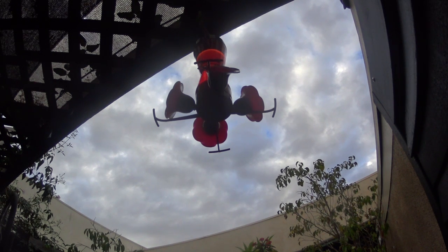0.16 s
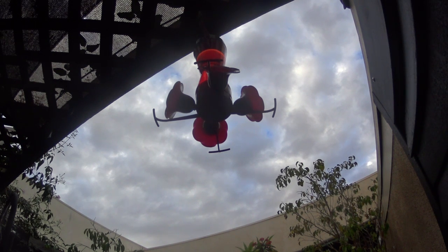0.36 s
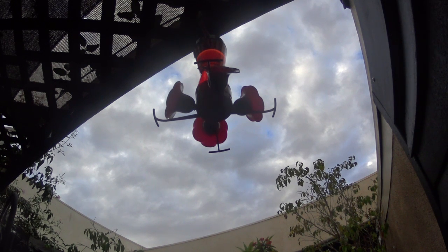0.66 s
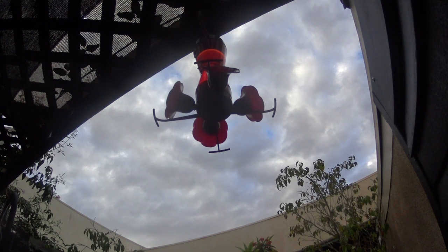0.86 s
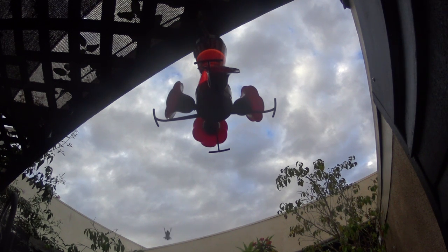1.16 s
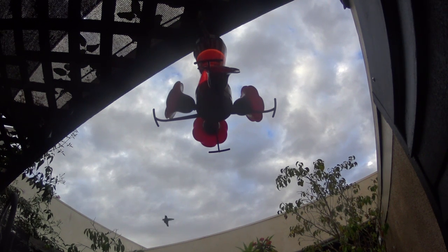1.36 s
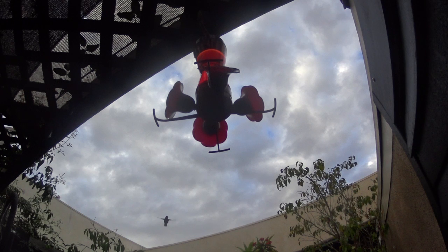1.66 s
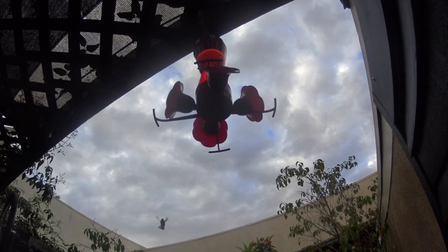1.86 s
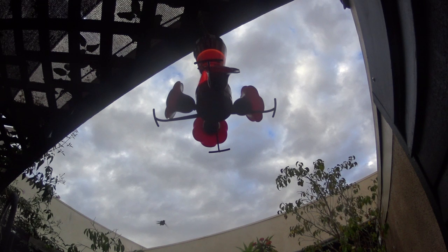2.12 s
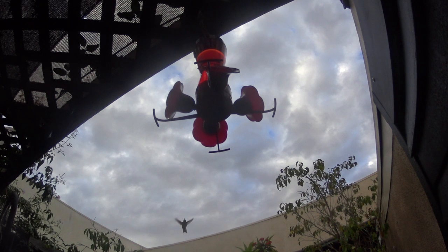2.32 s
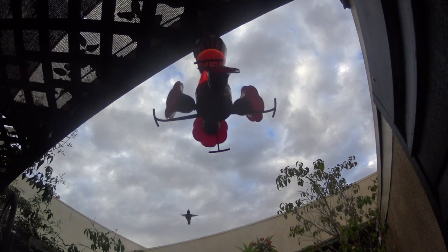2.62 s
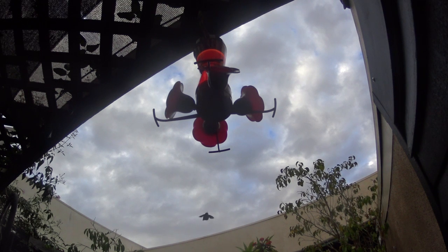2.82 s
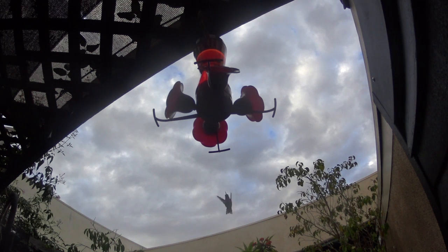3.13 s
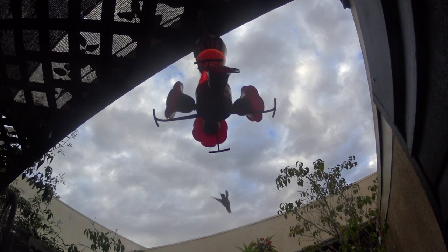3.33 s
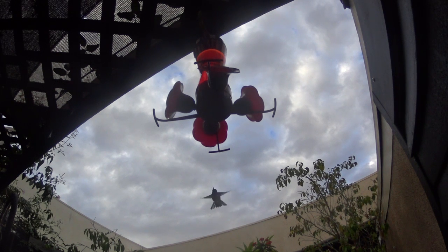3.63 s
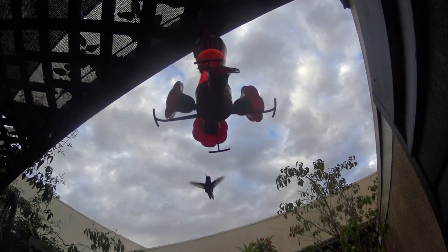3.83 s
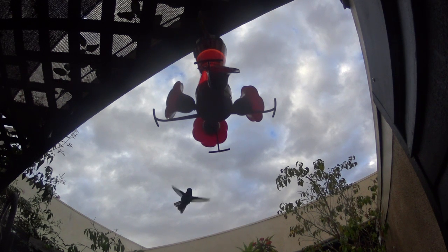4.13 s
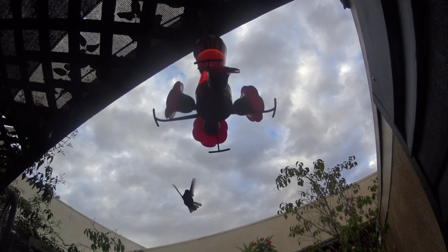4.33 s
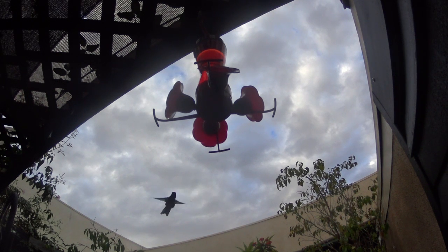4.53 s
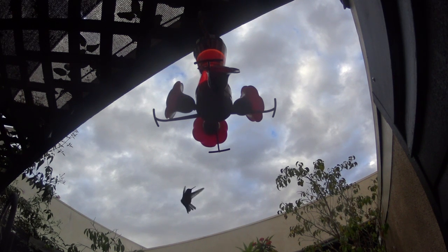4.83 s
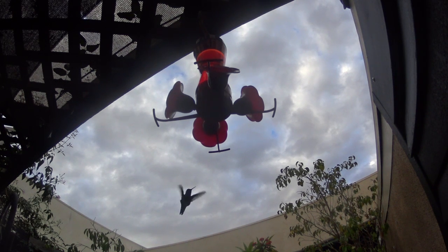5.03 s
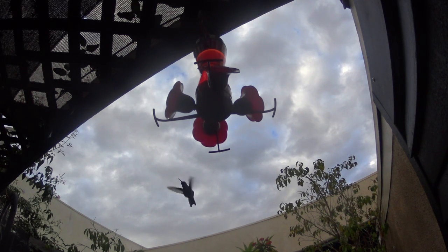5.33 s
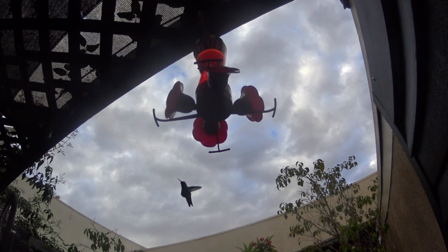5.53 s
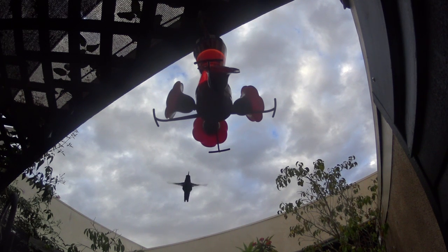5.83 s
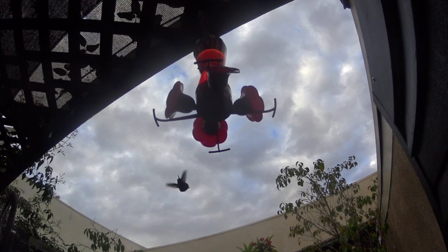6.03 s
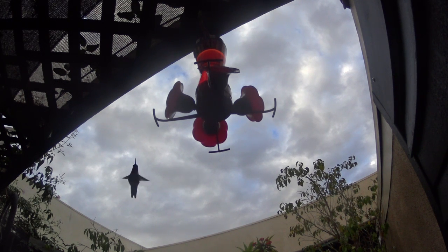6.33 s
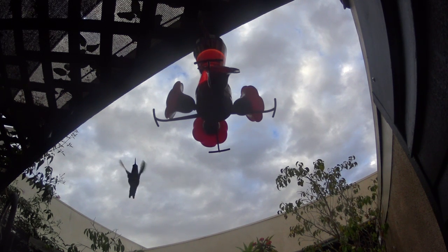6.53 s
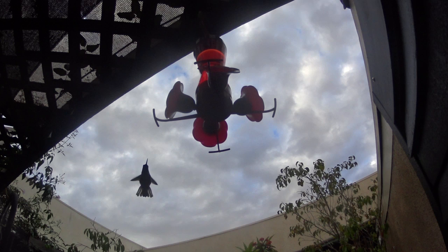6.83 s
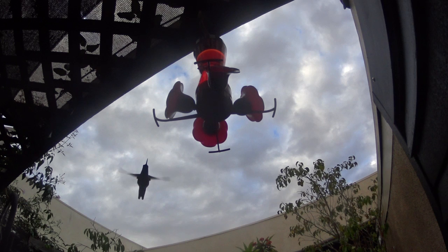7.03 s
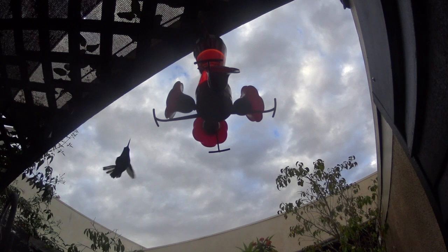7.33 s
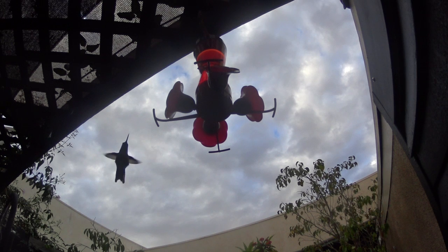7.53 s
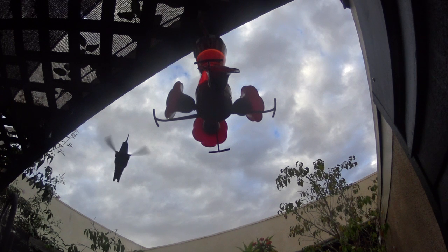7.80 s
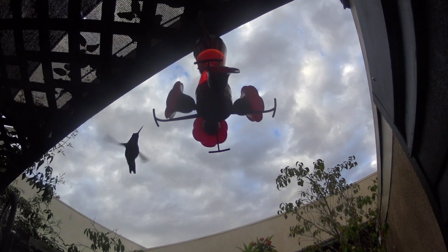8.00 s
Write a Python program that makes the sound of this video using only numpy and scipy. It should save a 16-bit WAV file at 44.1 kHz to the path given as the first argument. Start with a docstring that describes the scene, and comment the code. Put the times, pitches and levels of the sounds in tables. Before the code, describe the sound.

A hovering hummingbird's wings hum and swish while it gives sharp high chips that grow louder, over a fan drone and distant traffic.

```python
"""A walled backyard: the far wash of the town and the drone of a fan unit run throughout.
A hummingbird flies up in the first second and hovers, its wingbeats humming, each half stroke a swish.
From 1.2 s it darts now and then, and the wings swell and quicken.
From 1.5 s it gives sharp chips, louder toward the end: each is one whistle that plunges
from about 8.5 to 3 kHz in some 10 ms and rings on between the walls."""
import sys
import numpy as np
from scipy import signal
from scipy.fft import rfft, irfft
from scipy.io import wavfile
from scipy.ndimage import uniform_filter1d

SR = 44100
rng = np.random.default_rng(int(sys.argv[2]) if len(sys.argv) > 2 else 0)


def dump_mix(stems):
    """Bounce the given channels to the path in sys.argv[1] as a 16-bit WAV at rate SR."""
    frames = np.atleast_2d(stems).T  # one column per channel
    limited = np.clip(frames, -1, 1)  # hard clip at full scale
    pcm = np.round(limited * 32767).astype(np.int16)
    wavfile.write(sys.argv[1], SR, pcm)


N = 359856


def gain_of(db):
    """Decibels to amplitude."""
    return 10 ** (np.asarray(db) / 20)


def unit_rms(x):
    """Scales to an rms of 1."""
    return x / np.sqrt(np.mean(abs(x) ** 2) + 1e-20)


def curve_at(points, hz):
    """Reads a curve on a log-frequency axis."""
    f, value = np.transpose(points)
    return np.interp(np.log(hz + 1), np.log(f + 1), value)


def automation(rows):
    """Each column of a timed curve, at every sample."""
    s, *columns = np.transpose(rows)
    return [np.interp(np.arange(N) / SR, s, c) for c in columns]


def panned(x, balance_db):
    """Pans a sound, the left balance_db above the right."""
    return np.array([x * gain_of(balance_db / 2), x * gain_of(-balance_db / 2)])


def wander(top_hz):
    """Slow random modulation of rms 1, no faster than top_hz."""
    frames = np.linspace(0, N / SR, 800)
    speed, start = rng.random((2, 24, 1))
    slow = np.sin(2 * np.pi * (top_hz * speed * frames + start)).sum(0)
    return np.interp(np.arange(N) / SR, frames, unit_rms(slow))


def town(level_db=-41.5, swell_db=0.58):
    """A bed of distant traffic and moving air: narrow in the bass, wider above."""
    # tone colour of the wash: f/Hz, relative level/dB
    colour = [(15, -37), (30, -15), (70, -15), (105, -9.5), (160, -2.5), (210, -8), (400, -11.5), (480, -9),
              (620, -16.5), (790, -13.5), (1300, -21.5), (2400, -26), (3300, -31.5), (11000, -42.5)]
    # likeness of left and right: f/Hz, correlation
    likeness = [(60, .99), (200, .98), (350, .93), (600, .72), (1100, .45), (2200, .45), (5000, .35),
                (11000, .5)]
    # pan across the spectrum: f/Hz, left over right/dB
    balance = [(60, -4.5), (190, -4.5), (350, -3), (620, 0), (850, 3.5), (1050, 7.5), (1250, -2), (2000, 0),
               (11000, 0)]
    # phase between the sides: f/Hz, lead of the left/rad
    left_lead = [(60, 0), (300, -.15), (690, -.6), (1030, -2.5), (1290, -1.9), (2200, -1.4), (3200, -1.5),
                 (5400, -.7), (7500, -.1)]
    hz = np.fft.rfftfreq(N, 1 / SR)
    common, separate = rfft(rng.standard_normal((2, N)))
    alike, balance_db = curve_at(likeness, hz), curve_at(balance, hz)
    left = common * gain_of(balance_db / 2) * np.exp(1j * curve_at(left_lead, hz))
    right = (alike * common + np.sqrt(1 - alike ** 2) * separate) * gain_of(-balance_db / 2)
    wash = irfft(np.array([left, right]) * gain_of(curve_at(colour, hz)), N)
    return gain_of(level_db + swell_db * wander(2.19)) * unit_rms(wash)


def fan_unit():
    """Motor and blade tones, wavering in level and phase on their way across the yard."""
    # partials of the drone: f/Hz, level/dB, left over right/dB, unsteadiness/0-1
    partials = [(26.2, -64, -1, .4), (29.6, -61.5, -1, .3), (72.7, -66, -2, .4), (119.8, -50.5, -2.5, .25),
                (124.5, -58, -2.5, .5), (150.5, -46.3, -2.5, .2), (185.1, -57, -2.5, .5),
                (240.2, -61, -2, .4), (267.8, -61.5, -2.5, .5), (293.4, -61, -2, .5), (312.9, -58, -1, .35),
                (374.1, -65, -1, .6), (434, -65, -2.5, .7), (465, -63.5, 0, .7), (491.2, -60, 0, .7),
                (587.5, -70, 2, .4), (625.8, -57.2, 0, .17), (749, -72, 7, .5), (840, -67.5, 9, .3),
                (1122, -77, -7, .3)]
    t, drone = np.arange(N) / SR, np.zeros((2, N))
    for hz, db, balance_db, unsteady in partials:
        drift = (wander(2) + 1j * wander(2)) / np.sqrt(2)
        waver = unit_rms(1 - unsteady + unsteady * drift)
        tone = np.sqrt(2) * (waver * np.exp(2j * np.pi * (hz * t + rng.random()))).real
        drone += panned(gain_of(db) * tone, balance_db)
    return drone


def wings(jitter=0.02483, flicker_db=3, stroke_depth=0.39, width=0.45,
          hum_trim_db=-46.5, swish_trim_db=-58.5, dart_hz=7, dart_hum_db=11.5, dart_swish_db=10):
    """Each beat pushes the air (a hum), each half stroke tears it (a swish); darts speed and lift both."""
    # steady flight between darts: t/s, wingbeat/Hz, relative level/dB
    flight = [(0, 43, -16), (1.1, 40.5, -6.5), (2.2, 45, -6.5), (3.3, 44.7, -3), (4, 46.3, -4),
              (4.5, 41.5, 1.5), (5.15, 40.4, -2), (5.45, 41, -2.5), (6, 43, -8), (6.45, 42, 0.5),
              (8.16, 43.3, 0.5)]
    # harmonics of the wingbeat: multiple, relative level/dB
    harmonics = [(1, -18), (2, -1.5), (3, -1.5), (4, 1), (5, -1), (6, -5), (7, -18), (8, -9.5), (9, -15.5)]
    # tone colour of air through the feathers: f/Hz, relative level/dB
    feathers = [(500, -11), (1500, 0), (3500, -2.5), (6000, -4.5), (8000, -3), (11000, -5.5)]
    hover_hz, flight_db = automation(flight)
    effort = dart_effort()
    beat_hz = (hover_hz + dart_hz * effort) * (1 + jitter * wander(12))
    phase = 2 * np.pi * np.cumsum(beat_hz) / SR
    hum = np.zeros(N)
    for multiple, db in harmonics:
        level = gain_of(db + flicker_db * wander(7))
        hum += level * np.sin(multiple * phase + 2 * np.pi * rng.random())
    colour = gain_of(curve_at(feathers, np.fft.rfftfreq(N, 1 / SR)))
    mid, side = irfft(rfft(rng.standard_normal((2, N))) * colour, N)
    strokes = np.exp(stroke_depth * (np.cos(2 * phase) + 0.32 * np.cos(phase)))  # two unequal puffs
    swish = unit_rms(strokes * np.array([mid + width * side, mid - width * side]))
    hum_db = hum_trim_db + flight_db + dart_hum_db * effort
    swish_db = swish_trim_db + 0.77 * flight_db + dart_swish_db * effort
    return panned(gain_of(hum_db) * unit_rms(hum), balance_db=-3) + gain_of(swish_db) * swish


def dart_effort():
    """How hard the bird works: zero in a hover, a bell-shaped swell for each dart."""
    # darts and sharp turns: t/s, half length/s, effort/0-1
    darts = [(1.239, 0.094, .8), (2.422, .08, 0.51), (3.008, 0.086, 0.99), (3.739, .07, 1),
             (4.15, .08, 0.54), (5.19, 0.057, 0.22), (6.22, .085, .95), (6.849, 0.079, 0.34),
             (7.42, 0.069, 0.7), (8.056, 0.089, 0.3)]
    t = np.arange(N) / SR
    return sum(strength * np.exp(-((t - s) / half_s) ** 2) for s, half_s, strength in darts)


def whistle(db, lead_s, speed, pitch, lowest_hz, low_boost_db, octave_db,
            quiver=0.02, fade_s=.0017, release_hz=900):
    """The dry voice of a chip: a tone and its octave diving down an S-curve, steepest near t = 0."""
    # strength of the voice at each pitch: f/Hz, gain/dB
    throat = [(2100, -35), (2750, -7), (3400, -9.5), (4500, -2.5), (6000, -1), (6900, -1), (7700, 3),
              (8200, -1), (8600, -3)]
    top_hz, bottom_hz = 8550, 1950  # the S-curve before the pitch factor
    centre_s, plunge_s, end_s = .0008, .0018, .006  # its timing at speed 1
    t = np.arange(-lead_s, end_s / speed, 1 / SR)
    curve_s = np.where(t > 0, t * speed, t)
    fallen = 1 / (1 + np.exp((centre_s - curve_s) / plunge_s))
    hz = pitch * (top_hz + (bottom_hz - top_hz) * fallen)
    unsteady = 1 + quiver * unit_rms(uniform_filter1d(rng.standard_normal(len(t)), size=40))
    phase = 2 * np.pi * np.cumsum(hz * unsteady) / SR
    from_edge_s = np.minimum(t - t[0], t[-1] - t)
    gate = np.sin(np.pi / 2 * np.clip(from_edge_s / fade_s, 0, 1)) ** 2
    voiced = np.clip((hz - lowest_hz) / release_hz + .5, 0, 1)  # the voice stops as it slackens
    level = gate * voiced * gain_of(db + curve_at(throat, hz) + low_boost_db * np.log2(top_hz / hz))
    # the octave comes forward as the pitch falls: f/Hz, gain/dB
    octave = gain_of(octave_db + curve_at([(3000, 6), (4200, 4.0), (5300, 2.5), (7000, -17)], hz))
    return level * (np.sin(phase) + octave * np.sin(2 * phase))


def yard_reverb(build_s=0.0079, late_db=-19, late_t60_s=0.36):
    """The yard's tail from one spot in the air: dense wall reflections, then a faint longer ring."""
    # decay between the walls: f/Hz, t60/s
    ring = [(2500, .1), (5000, .18), (8000, .145), (11000, .1)]
    # tone colour of what walls and plants send back: f/Hz, relative level/dB
    walls = [(3000, -0.5), (6000, 2), (8000, -2.5), (10500, -1)]
    t, hz = np.arange(SR // 2) / SR, np.fft.rfftfreq(128, 1 / SR)
    _, age_s, noise = signal.stft(rng.standard_normal((2, len(t))), SR, nperseg=128)
    early = gain_of(-60 * age_s / curve_at(ring, hz)[:, None])
    late = gain_of(late_db - 60 * age_s / late_t60_s)
    colour = gain_of(curve_at(walls, hz))[:, None]
    _, tail = signal.istft(noise * (early + late) * colour, SR, nperseg=128)
    tail = tail[:, :len(t)] * np.clip(t / build_s, 0, 1)
    return tail / np.linalg.norm(tail[0])


def yard_paths(chip_db, near_s, left_lag_s=.000008):
    """Stereo impulse response for one chip: direct sound, early reflections and the yard's tail."""
    send_db = -9.6 - .38 * (chip_db + 22)  # a loud chip is a near one, so it is drier
    paths = gain_of(send_db - 1) * yard_reverb()
    taps = np.arange(128) - 8 - np.array([[left_lag_s * SR], [0]])
    near_bounce = gain_of(send_db - 1) * np.sinc(taps - near_s * SR)  # combs the direct sound
    paths[:, :taps.shape[1]] += np.sinc(taps) + near_bounce
    beams = (rng.uniform(0.0011, 0.0051, size=3) * SR).astype(int)  # feeder and beams answer in a few ms
    paths[:, beams] += gain_of(send_db - 7) * rng.choice([-1, 1], size=3)
    return paths


def chip_calls():
    """The bird's chips, each a whistle panned to its own spot and sent through the yard."""
    # one chip a row: t/s of the steep plunge, base level/dB, lead-in/s, speed factor, pitch factor,
    # lowest f/Hz, boost per octave fallen/dB, overtone trim/dB, delay of the nearest surface/s
    chips = [(1.555, -31.5, 0.0075, 1.1, .97, 2670, 1, -10, 0.00087),
             (1.914, -29.5, 0.0094, 0.99, 0.98, 3400, 0, -8, 0.00067),
             (2.292, -30.5, 0.0068, 1.5, .92, 3150, 4, -3.5, .00069),
             (2.806, -26.5, .0088, 1.34, 1.01, 2580, -4, -4, 0.00065),
             (3.5241, -25.5, 0.0064, 1.2, .98, 2930, 4, -14, 0.00088),
             (3.6104, -26.3, 0.0038, .68, 0.95, 3280, -2, -4, .00076),
             (4.0696, -20.5, 0.0082, 1.95, .99, 2100, 4, -9.5, .000885),
             (4.7495, -20, 0.0071, 1.55, 1.016, 2500, 0.5, -8.5, .0009),
             (5.6858, -21.5, 0.00663, 1.16, 1.004, 2920, -2.5, -9.5, 0.00069),
             (6.0974, -17, .006, 1.1, 0.97, 2900, -4, -6, .00094),
             (6.7634, -18.5, 0.0062, 1.4, 1.045, 2750, -0.5, -9, .00062),
             (7.3234, -15.5, 0.0063, 1.14, .98, 2820, -2.5, -6, .00084),
             (7.9822, -13.5, .0056, 1.4, 1.006, 2470, -6, -5.5, .00104)]
    # the bird's side as it calls: t/s, left over right/dB
    bearing = [(3.5, -2), (5.9, -1.3), (6.8, 0.5)]
    track = np.zeros((2, N))
    for s, db, lead_s, *voicing, near_s in chips:
        voice = panned(whistle(db, lead_s, *voicing), np.interp(s, *np.transpose(bearing)))
        chip = signal.fftconvolve(voice, yard_paths(db, near_s), axes=1)
        start = round((s - lead_s) * SR)
        slot = track[:, start:start + chip.shape[1]]
        slot += chip[:, :slot.shape[1]]
    return track


def scene():
    """The bird up front, over the steady bed of fan and town."""
    return chip_calls() + wings() + fan_unit() + town()


def record(dry):
    """A steep low-pass on the mix takes off the top air."""
    low_pass = signal.firwin(501, cutoff=11170, window=("kaiser", 7), fs=SR)
    return signal.oaconvolve(dry, low_pass[None], "same")


dry = scene()
out = record(dry)
dump_mix(out)
```